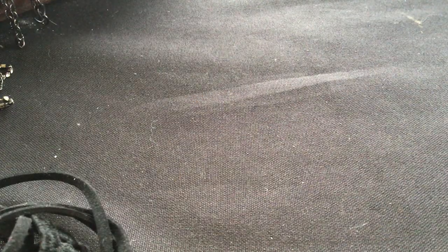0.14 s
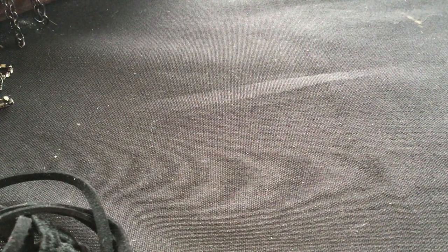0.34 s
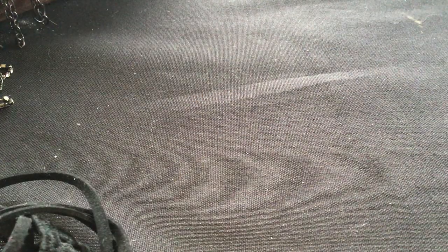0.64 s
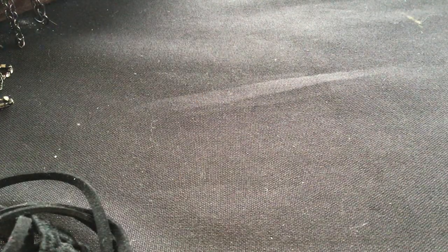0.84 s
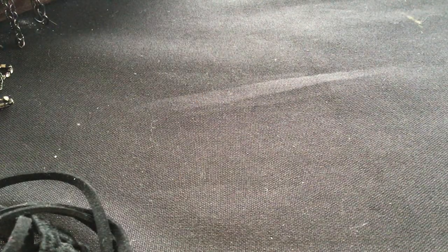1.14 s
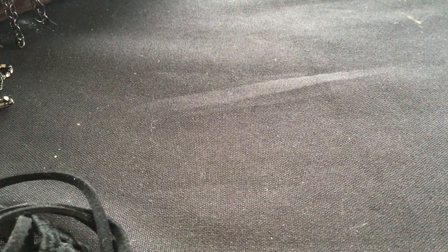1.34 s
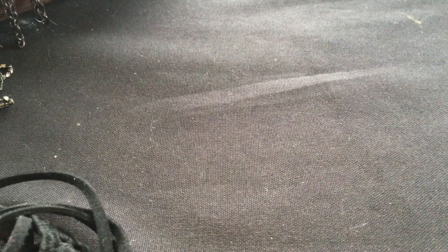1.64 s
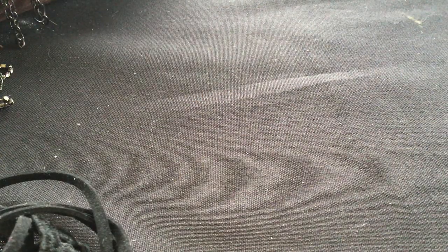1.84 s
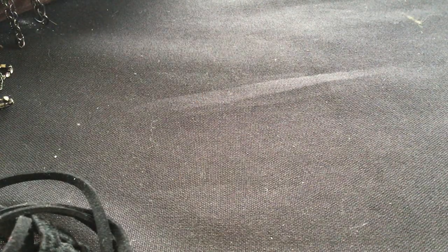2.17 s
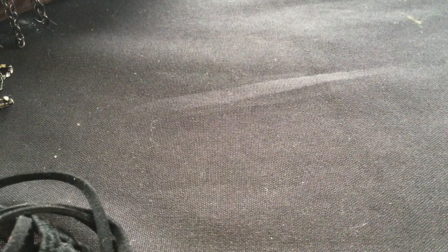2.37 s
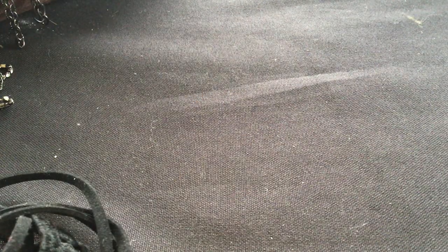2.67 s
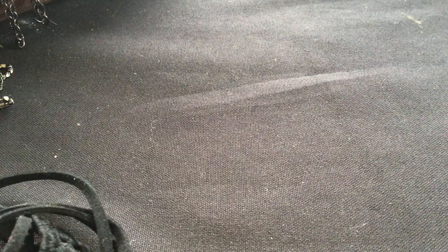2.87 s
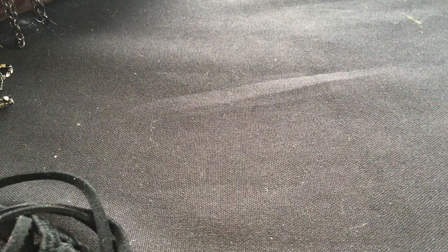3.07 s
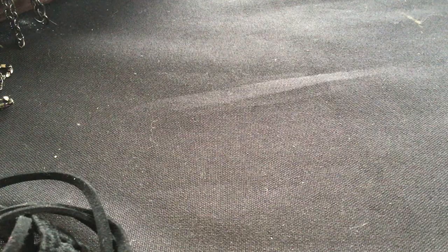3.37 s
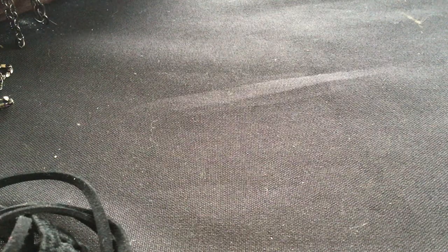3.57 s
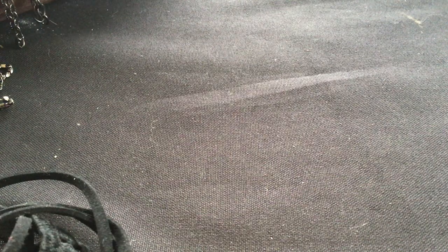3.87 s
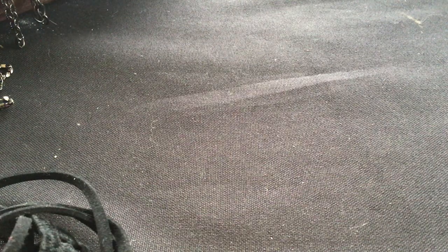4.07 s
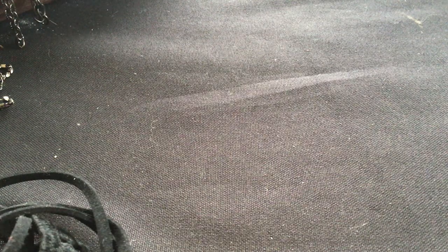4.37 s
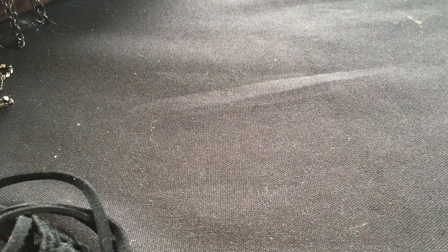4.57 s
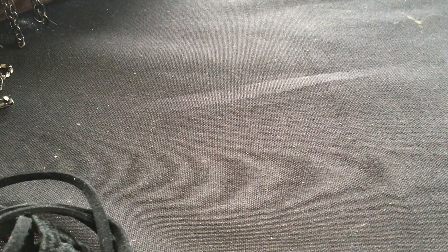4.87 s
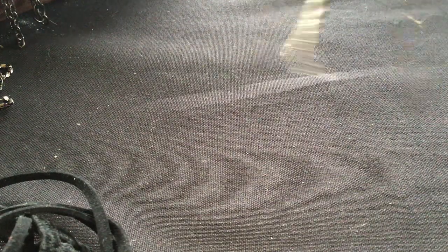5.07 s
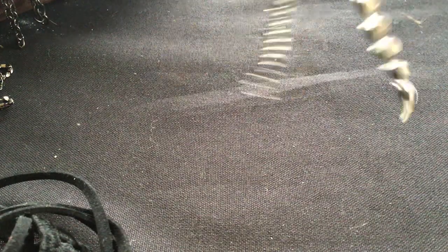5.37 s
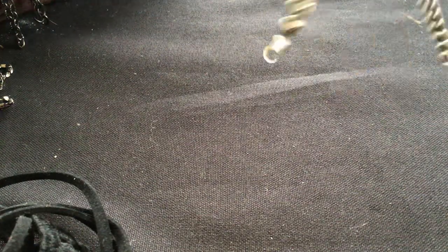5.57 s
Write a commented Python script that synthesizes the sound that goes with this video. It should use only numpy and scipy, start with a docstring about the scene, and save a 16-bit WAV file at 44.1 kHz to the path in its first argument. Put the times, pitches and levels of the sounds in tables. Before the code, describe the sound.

Fingers sort through costume jewelry on a cloth, close to the microphone. Light scattered ticks come first, then a sharp clatter of beads and links with a brief ring. The rummaging gets busier, with tinking charms, softly hissing chains and small dull bumps, and ends in another loud rattle. Outdoors, a distant engine hums over a faint street wash, and a bird chirps faintly twice.

```python
"""Costume jewelry clicks and rattles close up as fingers rummage through it outdoors.
Beads and links knock together with a crack and a brief ring, thin charms tink, heavier pieces
bump on the cloth and chains hiss as they slide. A dull rustle and street wash grows toward the end.
Behind it all a distant engine hums over the steady street, and a bird chirps twice."""
import sys
import numpy as np
from scipy import signal
from scipy.io import wavfile
from scipy.ndimage import uniform_filter1d

SR = 44100
rng = np.random.default_rng(int(sys.argv[2]) if len(sys.argv) > 2 else 0)


def log_audio(samples):
    """Write samples as a 16-bit WAV file to the path given in sys.argv[1]."""
    # one column per channel
    frames = np.atleast_2d(samples).T
    # limit to full scale, then quantise
    limited = np.clip(frames, -1, 1)
    pcm = np.round(limited * 32767).astype(np.int16)
    wavfile.write(sys.argv[1], SR, pcm)


N = 251722

# the hand moving in the pile: time_s, slide_db, rattle_db
HAND_MOVES = [(0.0, -69, -65.5), (0.15, -80, -80.5), (0.24, -71, -66.5), (0.4, -84, -79.5),
              (0.56, -67, -75), (0.66, -78, -72), (0.85, -80, -78), (1.04, -75, -79.5), (1.2, -65, -68.5),
              (1.28, -81, -72), (1.46, -63, -67), (1.6, -74, -76), (1.7, -81, -68.5), (1.84, -65, -76),
              (1.92, -85, -76), (2.0, -66, -72.5), (2.08, -78, -85), (2.32, -65.5, -78), (2.41, -71, -79),
              (2.56, -44, -46.5), (2.65, -55.5, -62.5), (2.8, -63, -60.5), (2.9, -64, -66.5),
              (3.12, -54, -66), (3.2, -59, -66.5), (3.28, -44.5, -58), (3.45, -66, -64), (3.54, -71.5, -72),
              (3.72, -56, -61), (3.84, -56.5, -61.5), (3.94, -64, -56.5), (4.08, -59, -62.5),
              (4.22, -70, -51), (4.4, -56, -49), (4.58, -71, -72.5), (4.73, -84, -66), (4.86, -50, -51.5),
              (4.98, -58, -66.5), (5.12, -50, -55.5), (5.2, -68, -49.5), (5.36, -66, -53),
              (5.46, -85.5, -84.5), (5.6, -87, -92), (5.71, -75, -68.5)]


def gain_of(db):
    """Decibels to amplitude."""
    return 10 ** (np.asarray(db) / 20)


def unit_rms(x):
    """Scale to an RMS of one."""
    return x / np.sqrt(np.mean(x ** 2) + 1e-20)


def curve(rows, column):
    """One column of a timed table, drawn out to every sample."""
    rows = np.array(rows)
    return np.interp(np.arange(N) / SR, rows[:, 0], rows[:, column])


def add(mix, start_s, sound):
    """Lay a sound into the mix."""
    part = mix[round(start_s * SR):][:len(sound)]
    part += sound[:len(part)]


def filtered(x, order, edges_hz, kind):
    """Butterworth filter."""
    return signal.sosfilt(signal.butter(order, edges_hz, kind, fs=SR, output="sos"), x)


def textured_noise(spectrum, patchy_db, flicker_db, size=512):
    """Coloured noise at unit RMS, with drifting patches of tone and a flicker in overall level."""
    hop = size // 4
    frames, hz = N // hop + 5, np.fft.rfftfreq(size, 1 / SR)
    points_hz, points_db = np.transpose(spectrum)
    colour_db = np.interp(np.log(hz + 1), np.log(points_hz + 1), points_db)
    real, imag, patches = rng.standard_normal((frames, len(hz), 3)).T
    patches = unit_rms(uniform_filter1d(uniform_filter1d(patches, size=10, axis=0), size=12, axis=1))
    flicker = unit_rms(uniform_filter1d(rng.standard_normal(frames), size=3))
    spectra = (real + 1j * imag) * gain_of(colour_db[:, None] + patchy_db * patches + flicker_db * flicker)
    return unit_rms(signal.istft(spectra, nperseg=size, noverlap=size - hop)[1][:N])


def street():
    """A steady bed of outdoor wash and microphone hiss."""
    # colour of the bed: frequency_hz, relative_db
    wash = [(12, -36), (20, 4.5), (55, 0), (96, 2), (179, -1), (237, -5), (440, -9.5), (729, -9.5),
            (1100, -16.5), (1690, -26), (4660, -32.5), (9000, -40.5), (13000, -38.5), (16500, -29)]
    return gain_of(-59) * textured_noise(wash, patchy_db=1.2, flicker_db=0.5, size=2048)


def engine():
    """A far-off hum of shaft orders; the air on the long path makes them swell and fade."""
    # the two strongest tones: time_s, low_pitch_hz, low_level_db, eighth_order_db
    drone = [(0.0, 95.2, -66.5, -67.5), (1.76, 94.7, -65, -62), (1.83, 95.5, -67, -76),
             (2.34, 94.8, -60.5, -70.5), (2.42, 100.7, -61.5, -74), (2.78, 93.5, -64.5, -81),
             (2.89, 95.2, -59.5, -63.5), (3.19, 94.9, -59.5, -82), (3.5, 94.2, -66, -60),
             (3.85, 94.6, -70.5, -62.5), (3.97, 99.5, -60.5, -88), (4.12, 103.7, -60.5, -60),
             (4.34, 105.1, -59.5, -59.5), (4.8, 104.1, -59.5, -72), (5.18, 89, -67, -63),
             (5.71, 104.4, -62.5, -86)]
    # the weaker tones: shaft_multiple, level_db, waver_width_hz
    orders = [(1.13, -71, 3.6), (2, -69.5, 2.3), (6, -72, 1.4), (7, -72, 1.5), (9, -72, 5.2),
              (10, -73.5, 2.9), (12, -67, 3.6), (16, -72.5, 0.98)]
    shaft_hz = 23.69
    t, hz = np.arange(N) / SR, np.fft.fftfreq(N, 1 / SR)
    low_tone = unit_rms(np.sin(2 * np.pi * np.cumsum(curve(drone, 1)) / SR))
    eighth_order = unit_rms(np.sin(2 * np.pi * 8 * shaft_hz * t))
    out = gain_of(curve(drone, 2)) * low_tone + gain_of(curve(drone, 3)) * eighth_order
    for multiple, level_db, width_hz in orders:
        white = rng.standard_normal(N) + 1j * rng.standard_normal(N)
        waver = np.fft.ifft(white * np.exp(-(hz / width_hz) ** 2))
        waver /= np.sqrt(np.mean(abs(waver) ** 2))
        tone = np.exp(2j * np.pi * multiple * shaft_hz * t)
        out += gain_of(level_db) * ((1.15 + 0.36 * waver) * tone).real
    return out


def bird():
    """Two chirps, each a pair of close pure voices gliding together."""
    # one list a chirp: time_s, lower_hz, upper_hz, level_db
    chirps = [
        [(1.735, 2500, 2940, -78), (1.752, 2750, 3100, -69), (1.775, 2690, 3170, -78), (1.8, 2750, 3250, -83)],
        [(5.586, 3340, 4000, -89), (5.594, 3590, 4340, -64), (5.601, 3820, 4550, -62), (5.613, 3550, 4170, -65),
         (5.624, 3295, 3870, -59), (5.632, 3285, 3850, -85)],
    ]
    out = np.zeros(N)
    for chirp in chirps:
        time_s, lower_hz, upper_hz, level_db = np.transpose(chirp)
        t = np.arange(time_s[0], time_s[-1], 1 / SR)
        lower, upper = [np.sin(2 * np.pi * np.cumsum(np.interp(t, time_s, hz)) / SR)
                        for hz in (lower_hz, upper_hz)]
        add(out, time_s[0], gain_of(np.interp(t, time_s, level_db)) * (lower + 0.56 * upper))
    return out


def dull_wash():
    """Dull low-mid rustle and street wash, swelling with the rattle and growing louder toward the end."""
    # colour of the wash: frequency_hz, relative_db
    colour = [(250, -34), (500, -3), (900, -1), (1500, -10.5), (2600, -16.5)]
    # rustle and street wash before the swell with the rattle is added: time_s, level_db
    base_level = [(0, -66), (1.5, -64.5), (2.4, -61), (3.5, -65.5), (4.4, -62), (5.2, -62), (5.45, -57.5),
                  (5.71, -57)]
    rattle_db = uniform_filter1d(curve(HAND_MOVES, 2), size=round(0.34 * SR))
    level_db = curve(base_level, 1) + 0.41 * (rattle_db + 63)
    return gain_of(level_db) * textured_noise(colour, patchy_db=4.0, flicker_db=1.5)


def strikes(crack_t60_s, freedom, favoured_hz, size=2200):
    """One row a contact: a crack of noise and the modes it sets ringing, each piece with its own mix."""
    # modes of the metal: pitch_hz, level_db, t60_s
    modes = [(2930, -17.5, 0.01), (3450, 1.5, 0.015), (4056, 1, 0.021), (4524, -3, 0.017),
             (5530, -1.5, 0.018), (6395, -7, 0.026), (7015, -7.5, 0.045), (7810, -3, 0.021),
             (8520, 2.5, 0.016), (10085, 0.5, 0.015), (10920, -1, 0.019), (12100, -1.5, 0.023),
             (12800, -6, 0.021), (14280, -2.5, 0.03), (14210, -17, 0.017), (14800, -16.5, 0.014)]
    t = np.arange(size) / SR
    mode_hz, mode_db, mode_t60_s = np.transpose(modes)
    draws = rng.standard_normal((len(freedom), size + 3 * len(modes)))
    hiss, balance, detune, phase = np.split(draws, size + len(modes) * np.arange(3), axis=1)
    freedom, crack_t60_s = np.clip(freedom, 0, 1)[:, None], crack_t60_s[:, None]
    rise = 1 - np.exp(-(t / (0.0003 + 0.084 * crack_t60_s)) ** 2)  # longer contacts build more slowly
    pile_reflections = gain_of(-22 - 60 * t / (0.0099 + 8.1 * crack_t60_s))
    spike = 1 + 1.55 * np.exp(-((t - 0.0006) / 0.00048) ** 2)  # the hardest instant of the contact
    crack = hiss * (gain_of(-60 * t / crack_t60_s) + pile_reflections) * spike
    # the spot struck favours the modes near its own pitch and pulls them there
    favour = np.exp(-(np.log(mode_hz / favoured_hz[:, None]) / 0.1324) ** 2)
    pitch_hz = mode_hz * (1 + 0.0033 * detune) * (1 - favour) + favoured_hz[:, None] * favour
    # a piece held in the fingers (freedom 0) is damped, a loose one (1) rings on
    ring_t60_s = mode_t60_s * (0.33 + 0.81 * freedom)
    onset_db = mode_db + 2.6 * balance + 7.5 * favour
    fade = gain_of(onset_db[..., None] - 60 * t / ring_t60_s[..., None])
    ring = (fade * np.sin(2 * np.pi * (pitch_hz[..., None] * t + phase[..., None]))).sum(1)
    ring /= abs(ring).max(1, keepdims=True)
    ring_share = 0.38 + 0.31 * freedom
    return rise * ((1 - ring_share) * crack / 2 + ring_share * ring)


def chain_rustle():
    """A chain slides with a fine smooth hiss; loose links rattle as grit and tiny ticks."""
    # colour of the rattling links: frequency_hz, relative_db
    grit_colour = [(1200, -9), (2000, -16), (3200, -3.5), (5000, -4), (6800, -5), (8300, -5.5), (11000, -4),
                   (15700, -17), (16500, -23)]
    # colour of the sliding chain: frequency_hz, relative_db
    slide_colour = [(4000, -43), (8000, -14), (11500, -1.5), (14600, 0), (16000, -5), (16500, -23)]
    ticks_per_s, ticks_db, variants = 150, -4, 24
    tick_sounds = strikes(crack_t60_s=rng.uniform(0.002, 0.009, variants),
                          freedom=rng.uniform(0, 0.4, variants),
                          favoured_hz=rng.uniform(3000, 15000, variants))
    strength = gain_of(1.2 * np.minimum(rng.exponential(1, N), 4))
    hits = strength * (rng.random(N) < ticks_per_s / SR)
    variant = rng.integers(0, variants, N)
    ticks = sum(signal.oaconvolve(hits * (variant == k), tick)[:N] for k, tick in enumerate(tick_sounds))
    ticks = gain_of(ticks_db) * unit_rms(filtered(ticks, 2, 3500, "high"))
    rattle = textured_noise(grit_colour, patchy_db=3.5, flicker_db=5.5, size=256) + ticks
    slide = textured_noise(slide_colour, patchy_db=1.3, flicker_db=1.3, size=256)
    return gain_of(curve(HAND_MOVES, 1)) * slide + gain_of(curve(HAND_MOVES, 2)) * rattle


def cloth_bumps():
    """Heavier pieces bump on the cloth: a short hollow tone with a puff of dull noise."""
    # the bumps: start_s, level_db, pitch_hz
    bumps = [(0.224, -52, 1100), (0.568, -53, 763), (1.139, -52, 506), (1.281, -51, 750),
             (2.524, -36.5, 778), (2.906, -50, 519), (3.042, -51, 729), (3.431, -48, 523),
             (3.529, -40, 835), (3.941, -52, 1240), (4.092, -53, 528), (4.149, -43, 1270),
             (4.223, -43, 1400), (4.245, -42, 1040), (4.274, -43.5, 694), (4.326, -48, 1080),
             (4.34, -47, 1470), (4.348, -46, 1090), (4.374, -39.5, 1320), (4.395, -35.5, 720),
             (4.461, -43.5, 880), (4.614, -54, 541), (4.81, -45, 1440), (4.991, -45.5, 890),
             (5.13, -43, 514), (5.232, -39.5, 490)]
    attack_s, t60_s = 0.0013, 0.022
    t, out = np.arange(2000) / SR, np.zeros(N)
    puffs = filtered(rng.standard_normal((len(bumps), len(t))), 2, (500, 2500), "band")
    for (start_s, level_db, pitch_hz), puff in zip(bumps, puffs):
        body = np.sin(2 * np.pi * pitch_hz * t) + 0.67 * unit_rms(puff)
        add(out, start_s, gain_of(level_db - 60 * t / t60_s) * (1 - np.exp(-t / attack_s)) * body)
    return out


def charm_tinks():
    """Each thin charm rings on one dying tone, fluttering as it swings against its neighbours."""
    # charms hanging free: start_s, pitch_hz, level_db, t60_s
    tinks = [(2.504, 8520, -22, 0.065), (2.526, 7060, -32, 0.065), (3.382, 10830, -43, 0.065),
             (3.392, 7800, -41, 0.055), (3.4, 10830, -52, .06), (3.476, 8980, -66, .08),
             (3.533, 9000, -49, 0.089), (3.54, 4050, -57, 0.076), (4.118, 12200, -37, 0.036),
             (4.117, 6900, -36, .04), (4.487, 8620, -38.5, .04), (4.836, 10870, -39, 0.17),
             (4.846, 10870, -41, 0.13), (5.148, 8520, -33, 0.052), (5.183, 7020, -37, .08),
             (5.291, 3450, -34, 0.025), (5.311, 3420, -31.5, 0.026)]
    t, out = np.arange(SR // 5) / SR, np.zeros(N)
    attack = 1 - np.exp(-t / 0.00074)
    for start_s, pitch_hz, level_db, t60_s in tinks:
        flutter_db = 3.5 * unit_rms(uniform_filter1d(rng.standard_normal(len(t)), size=200))
        tone = np.sin(2 * np.pi * (pitch_hz * t + rng.random()))
        add(out, start_s, gain_of(level_db + flutter_db - 60 * t / t60_s) * attack * tone)
    return out


def bead_clicks():
    """Beads and links click together; small pieces are bright, big ones dull and knock on the cloth."""
    # the contacts: start_s, peak_db, brightness_db (top band over low), crack_t60_s, favoured_hz
    contacts = [(0.0284, -43.5, 11, 0.011, 11090), (0.06, -48, 12, 0.003, 9940),
                (0.159, -48.5, 16, 0.006, 9580), (0.2129, -29, 21, 0.017, 14300),
                (0.2195, -32, 21, 0.0028, 14530), (0.225, -32.5, 3, 0.0053, 14600),
                (0.2326, -27.5, 17.5, 0.01, 9850), (0.329, -41, 5, 0.0032, 3400),
                (0.3735, -36.5, 18, 0.0051, 12130), (0.4758, -40.5, 5, 0.0022, 12260),
                (0.5014, -43, 3, 0.004, 3450), (0.569, -44.5, 7, 0.0049, 15300),
                (0.662, -40, 17, 0.003, 14060), (0.99, -45.5, 12, 0.004, 13900),
                (1.0, -44.5, 17, 0.005, 13540), (1.1399, -50, 1, 0.017, 15310),
                (1.235, -45.5, 20, 0.01, 15500), (1.2825, -44, 21, 0.003, 14800),
                (1.307, -43, 15, 0.0035, 13390), (1.374, -34.5, 13, 0.0017, 14400),
                (1.3835, -36.5, 21, 0.01, 13000), (1.4584, -47, 12, 0.015, 13610),
                (1.4697, -37, -1, 0.01, 13480), (1.5323, -43, 1, 0.004, 3470),
                (1.5538, -40, 15, 0.004, 11430), (1.6761, -40, 4, 0.0065, 4970),
                (1.9521, -52, 24, 0.022, 12000), (2.11, -46, 17, 0.003, 11910),
                (2.1865, -43.5, -1, 0.0062, 7100), (2.2812, -42.5, 12, 0.012, 14840),
                (2.3416, -46, 11, 0.0078, 13650), (2.391, -42, 10, 0.0055, 11860),
                (2.404, -36, 27, 0.004, 12370), (2.422, -42.5, 5.5, 0.0073, 11800),
                (2.4724, -33.5, 35, 0.003, 13950), (2.5026, -2, 0, 0.0043, 10160),
                (2.5137, -14.5, 1, 0.0047, 4260), (2.5243, -10, 5, 0.009, 14400),
                (2.543, -16.5, 5, 0.007, 4360), (2.5503, -14, 5, 0.0071, 12900),
                (2.5707, -17, 6.5, 0.0052, 8400), (2.58, -24, 14, 0.005, 12100),
                (2.589, -30, 17, 0.008, 10000), (2.6328, -24, 18, 0.0025, 11400),
                (2.637, -31, -0.5, 0.011, 6660), (2.689, -34, 18, 0.013, 6480),
                (2.7304, -41, 18, 0.0082, 13650), (2.7375, -14, 8, 0.0038, 13420),
                (2.75, -34, 2, 0.012, 5600), (2.7573, -32, 17, 0.0067, 9900),
                (2.7871, -28, 7, 0.0066, 5560), (2.7968, -30.5, 5, 0.0061, 5670),
                (2.8335, -46, 17, 0.012, 6440), (2.8873, -37.5, 14, 0.005, 10850),
                (2.9084, -39, 11, 0.0031, 13500), (2.936, -41, 14, 0.011, 14950),
                (2.986, -38, 25, 0.003, 12800), (3.136, -39, 20, 0.003, 14100),
                (3.16, -46, 32, 0.016, 13180), (3.202, -36, 16, 0.0076, 13760),
                (3.2083, -31.5, 0, 0.01, 3930), (3.297, -24, 17, 0.006, 12200),
                (3.3022, -19.5, 14, 0.004, 9720), (3.305, -22, 24, 0.0049, 12200),
                (3.32, -36, 3, 0.012, 6370), (3.334, -35, 34, 0.017, 14250),
                (3.3824, -35, 14, 0.008, 10850), (3.409, -33, 9, 0.005, 13280),
                (3.4143, -26, 17, 0.0038, 10730), (3.4325, -37, 2, 0.013, 3190),
                (3.4422, -38, 12, 0.0078, 11000), (3.531, -18.5, 3.5, 0.011, 8950),
                (3.5947, -42, 28, 0.01, 11740), (3.683, -36.5, 19, 0.0052, 9000),
                (3.7127, -31.5, 23, 0.0064, 8930), (3.7642, -39, 5, 0.014, 11130),
                (3.9354, -30, 9, 0.009, 12500), (3.9429, -28, 9, 0.0077, 8200),
                (3.948, -30.5, 2, 0.011, 6630), (3.9683, -25, 11, 0.005, 14730),
                (3.984, -35, 1, 0.006, 6700), (3.999, -33.5, 7, 0.0044, 6500),
                (4.0244, -35.5, 3, 0.017, 8210), (4.056, -31.5, 1, 0.0073, 6700),
                (4.0628, -28, 25, 0.0022, 9000), (4.0917, -35, 9, 0.009, 13370),
                (4.1167, -19.5, 18.5, 0.015, 14210), (4.153, -27.5, 10, 0.0099, 9860),
                (4.1766, -31.5, 3, 0.0086, 5880), (4.202, -30, 14, 0.008, 14280),
                (4.2254, -28.5, 7, 0.012, 3870), (4.232, -25, 14, 0.005, 13520),
                (4.244, -32, 16, 0.0063, 13140), (4.2622, -27, 21, 0.014, 11070),
                (4.2758, -18.5, 9.5, 0.0085, 6940), (4.289, -27, 18, 0.012, 12770),
                (4.311, -36, 17, 0.008, 12320), (4.327, -27, 12, 0.005, 6770),
                (4.3482, -37, 4, 0.01, 10030), (4.375, -16, 6.5, 0.0065, 10620),
                (4.3788, -19, -1, 0.0046, 7760), (4.3853, -29, 14, 0.015, 9780),
                (4.3956, -34, 9, 0.021, 5730), (4.446, -16.5, 17, 0.0082, 13240),
                (4.462, -32, 9, 0.017, 4055), (4.4779, -33, -2, 0.01, 5620), (4.4862, -25, 8, 0.0066, 8580),
                (4.5149, -27.5, 21, 0.0079, 12360), (4.537, -40.5, 24, 0.01, 12470),
                (4.581, -43.5, 16, 0.011, 10640), (4.6148, -34.5, -5, 0.005, 5640),
                (4.649, -29, -6, 0.0029, 5590), (4.7152, -42, -3, 0.011, 5500),
                (4.7213, -31.5, 5, 0.003, 5560), (4.751, -34, 13, 0.0069, 12100),
                (4.8049, -31, 20, 0.003, 13400), (4.8112, -27, -3, 0.0039, 5420),
                (4.8181, -29, 1, 0.005, 5600), (4.842, -32, 21, 0.014, 10950),
                (4.9544, -35.5, 18, 0.014, 12510), (4.9679, -35, 10, 0.007, 8820),
                (4.9922, -31, 11, 0.005, 9100), (5.026, -28.5, 3, 0.007, 5770),
                (5.06, -36, 17, 0.009, 7550), (5.091, -14.5, 2, 0.0057, 3930),
                (5.1045, -15.5, 3, 0.0033, 12360), (5.1177, -17.5, -3.5, 0.006, 3990),
                (5.127, -16.5, 6, 0.0055, 10920), (5.1313, -15.5, 9, 0.0086, 5640),
                (5.147, -12, 9, 0.0056, 10240), (5.1526, -29, 4, 0.013, 10270),
                (5.181, -18, 3, 0.0049, 5560), (5.1854, -15, 3, 0.0051, 8660),
                (5.207, -18.5, 5, 0.0048, 11200), (5.233, -10, 10.5, 0.0057, 11500),
                (5.245, -30, 2, 0.011, 6180), (5.2807, -25, 30, 0.003, 8540),
                (5.2895, -25, 9, 0.007, 13980), (5.3019, -29, 9, 0.004, 7800),
                (5.305, -23, 21, 0.004, 10750), (5.309, -23, 9, 0.009, 3400),
                (5.3177, -27, 19, 0.0054, 13630), (5.322, -26, 13, 0.004, 10660),
                (5.326, -30, 7, 0.017, 13220), (5.3354, -22, 5, 0.012, 5560), (5.372, -20, 5, 0.011, 5530),
                (5.3796, -35, 2, 0.016, 12470), (5.6363, -45, 12, 0.015, 12100),
                (5.65, -37.5, -7, 0.0024, 3320), (5.6527, -38.5, -14, 0.011, 3410)]
    # low, middle and top bands of a click, then the knock on the cloth: low_hz, high_hz
    bands = [(2650, 5000), (5000, 9500), (9500, 16500), (400, 1600)]
    start_s, peak_db, brightness_db, crack_t60_s, favoured_hz = np.transpose(contacts)
    # harder blows throw a piece loose
    freedom = 0.18 + 0.008 * (peak_db + 34) + 0.15 * rng.standard_normal(len(contacts))
    struck = strikes(crack_t60_s, freedom, favoured_hz)
    parts = [filtered(struck, 3, band, "band") for band in bands]
    *metal_bands, knock = [part / abs(part).max(1, keepdims=True) for part in parts]
    middle_lift_db = 7 * np.exp(-np.log(favoured_hz / 7000) ** 2 / 0.082)  # for pieces that ring there
    colour_db = [-brightness_db / 2, 0.094 * brightness_db + middle_lift_db, brightness_db / 2]
    metal = sum(band * gain_of(db)[:, None] for band, db in zip(metal_bands, colour_db))
    to_peak = gain_of(peak_db) / abs(metal).max(1)
    low_band_db = 20 * np.log10(to_peak) + colour_db[0]
    knock_db = -50 + 0.61 * (low_band_db + 33.5)
    clicks = to_peak[:, None] * metal + gain_of(knock_db)[:, None] * knock
    out = np.zeros(N)
    for at_s, click in zip(start_s, clicks):
        add(out, at_s, click)
    return out


def scene():
    """The jewelry up front and the outdoors behind it, in mono."""
    jewelry = bead_clicks() + charm_tinks() + cloth_bumps() + chain_rustle()
    return (jewelry + dull_wash() + street() + engine() + bird())[None]


def record(dry):
    """The highest treble drops steeply above a knee and is cut off a little higher."""
    knee_hz, cutoff_hz = 15780, 16950
    gains = [1, 1, gain_of(-31), gain_of(-70)]
    rolloff = signal.firwin2(401, [0, knee_hz, knee_hz + 200, SR / 2], gains, fs=SR)
    band_limit = signal.firwin(511, cutoff_hz, window=("kaiser", 9), fs=SR)
    dulled = signal.oaconvolve(dry, rolloff[None], "same")
    return signal.oaconvolve(dulled, band_limit[None], "same")


dry = scene()
out = record(dry)
log_audio(out)
```